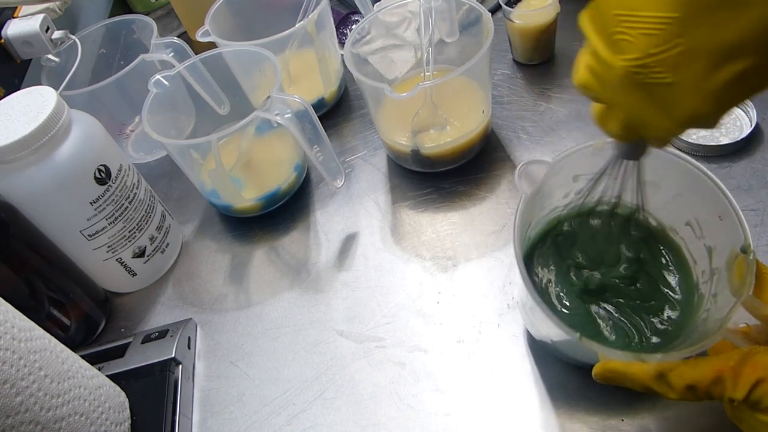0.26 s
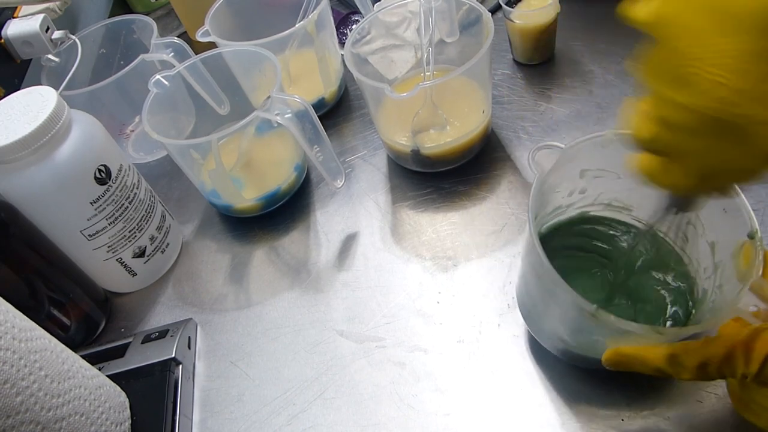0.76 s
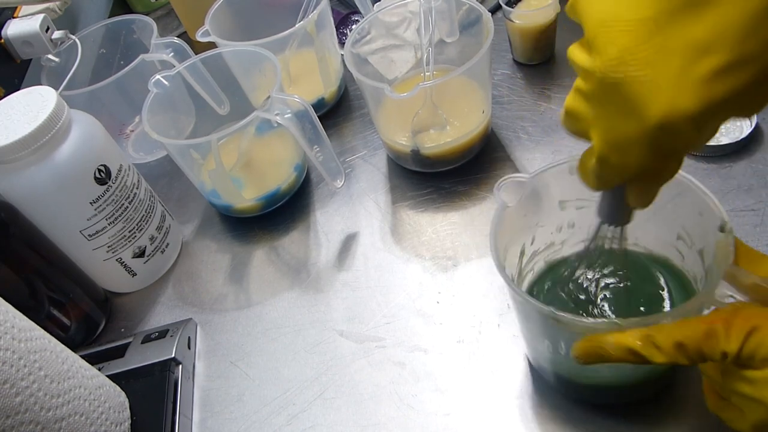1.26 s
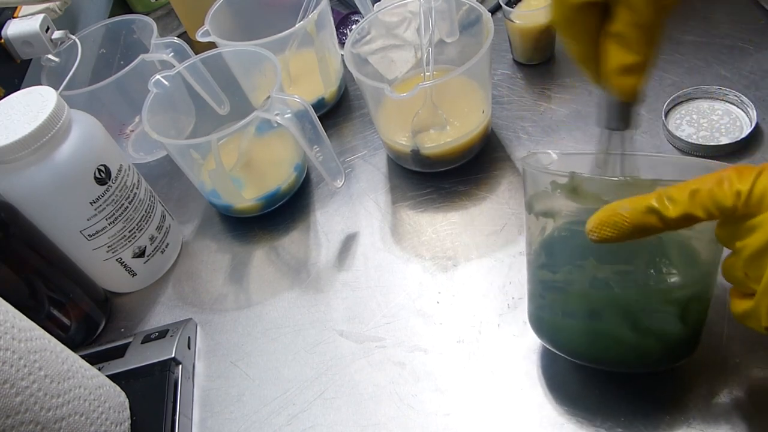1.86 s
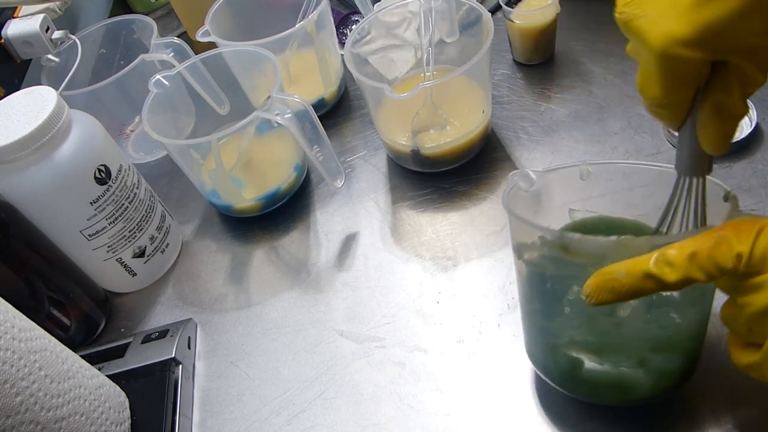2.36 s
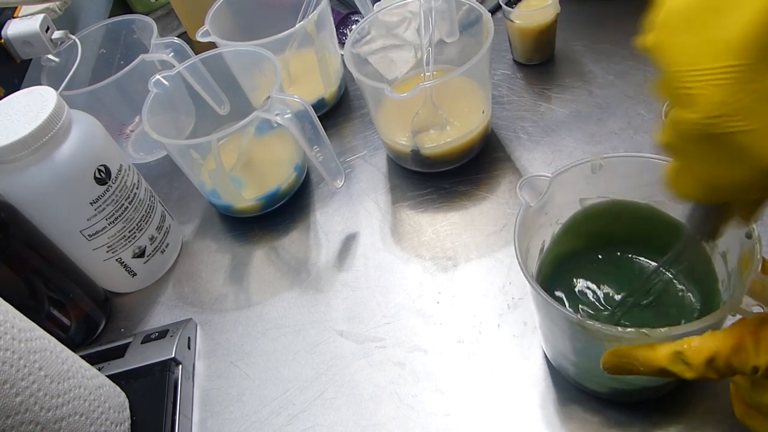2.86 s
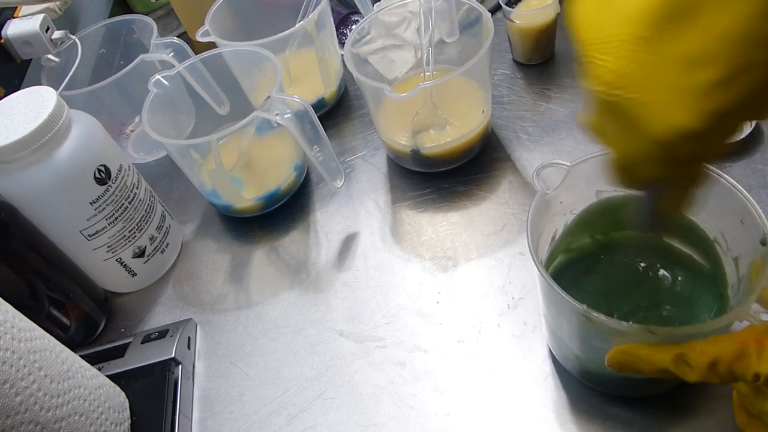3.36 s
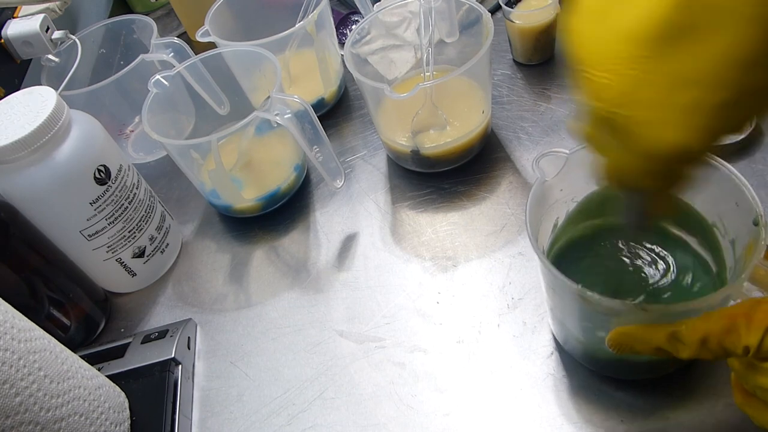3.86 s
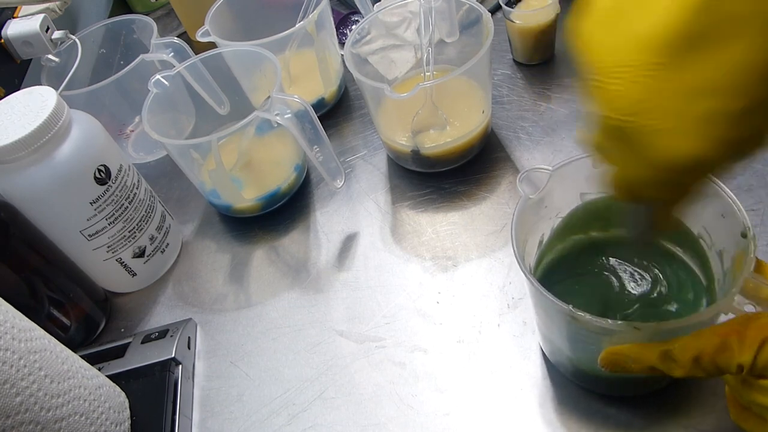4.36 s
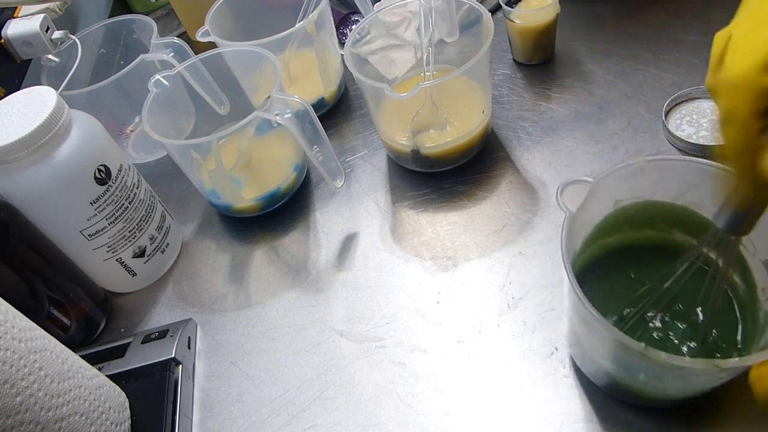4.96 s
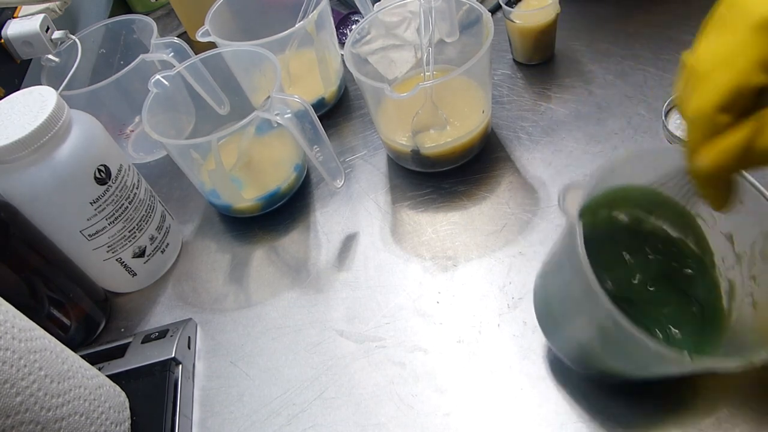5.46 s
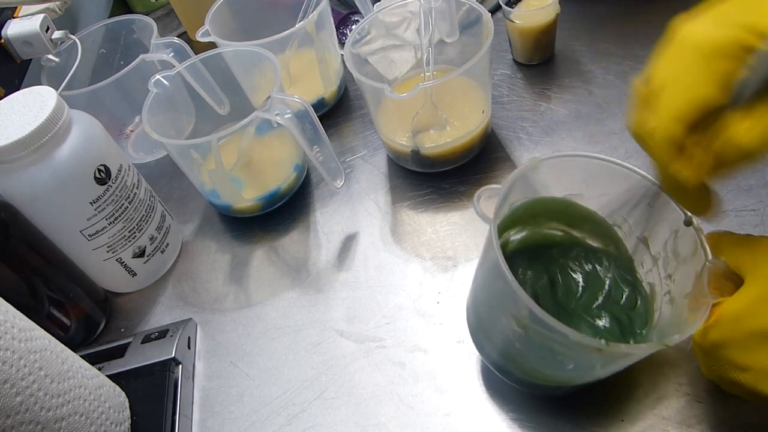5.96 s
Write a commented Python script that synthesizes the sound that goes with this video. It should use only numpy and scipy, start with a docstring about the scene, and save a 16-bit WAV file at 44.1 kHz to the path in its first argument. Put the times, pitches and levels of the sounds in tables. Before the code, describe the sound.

Quick bright clicks of a whisk knocking a plastic jug, with scratchy scraping and soft wet plops, easing into a brief lull before resuming.

```python
"""Quick bright rattles against a plastic jug: a wire whisk beats thick batter on a steel bench, close up.
Each blow is a burst of clicks that rings the jug wall; lighter, shorter blows fall among them.
Slips of the wires scratch the wall; batter slops and plops; the jug rocks and skids, shaking the bench.
A small hard room answers with a short stereo tail, over faint microphone hiss and one bright rustle."""
import sys
import numpy as np
from scipy import signal
from scipy.fft import rfft, irfft
from scipy.io import wavfile
from scipy.ndimage import uniform_filter1d

SR = 44100
rng = np.random.default_rng(int(sys.argv[2]) if len(sys.argv) > 2 else 0)


def file_out(sig):
    """Save sig as 16-bit WAV at sys.argv[1]."""
    # one column per channel
    cols = np.atleast_2d(sig).T
    # limit, then scale
    lim = np.clip(cols, -1, 1)
    pcm = np.round(lim * 32767).astype(np.int16)
    wavfile.write(sys.argv[1], SR, pcm)


N = 273949

# whisk blows on the wall: start_s, level_db (nominal), boom_db (re level_db), pitch_hz (of the struck spot)
BLOWS = [(0.065, -13.5, -17, 2810), (0.132, -11, -22, 3960), (0.207, -21, -13, 2790),
         (0.338, -7, -14.5, 4040), (0.444, -18, -17.5, 1770), (0.529, -14, -17.5, 2060),
         (0.588, -9.5, -41, 4030), (0.627, -14, -23, 3320), (0.649, -13.5, -28, 3050),
         (0.736, -9, -48, 3770), (0.775, -12.5, -29, 3980), (0.827, -13, -33, 2050),
         (0.843, -14.5, -33, 3490), (0.916, -6.5, -37, 3930), (0.978, -14, -34, 2940),
         (0.991, -13, -17, 3440), (1.013, -11.5, -22, 1753), (1.098, -11, -28, 2510),
         (1.117, -13, -14.5, 1940), (1.176, -14.5, -43, 3750), (1.254, -19.5, -36, 4050),
         (1.294, -18, -10.5, 2050), (1.416, -13, -14, 2110), (1.616, -11, -21, 2180),
         (1.661, -15.5, -21, 1820), (1.758, -14, -6, 3270), (1.848, -24, -9.5, 1730),
         (1.921, -14.5, -23, 2530), (1.974, -14, -18.5, 2370), (2.031, -14, -12.5, 2005),
         (2.115, -10.5, -11, 1530), (2.163, -19, -6.5, 3660), (2.19, -16.5, -18, 2500),
         (2.203, -16.5, -29, 3030), (2.26, -18, -8, 2205), (2.308, -19.5, -20, 4040),
         (2.322, -12.5, -14.5, 3390), (2.433, -18.5, -12.5, 2660), (2.482, -17, -16, 2700),
         (2.497, -17.5, -26, 2980), (2.548, -15, -22, 2360), (2.602, -10.5, -25.5, 3570),
         (2.699, -17, -18, 2430), (2.721, -15.5, -24, 2180), (2.746, -16, -23, 3090),
         (2.817, -13.5, -25, 3500), (2.858, -12.5, -27, 3270), (2.955, -12, -13, 1930),
         (3.128, -11.5, -35, 3100), (3.269, -14.5, -19, 2410), (3.325, -17.5, -29, 2300),
         (3.36, -16, -16, 2195), (3.425, -18.5, -13, 1960), (3.461, -22, -24, 1990),
         (3.511, -15.5, -28, 2270), (3.575, -15.5, -17, 3240), (3.607, -11, -20, 2530),
         (3.638, -16.5, -22, 2150), (3.709, -18.5, -22, 4040), (3.754, -16, -21, 2150),
         (3.808, -16.5, -14, 2025), (3.852, -15.5, -22, 2700), (3.871, -14.5, -35, 2440),
         (3.943, -16.5, -8.5, 3050), (4.001, -15, -37, 3300), (4.119, -13.5, -42, 2360),
         (4.158, -11.5, -17, 2260), (4.185, -14, -9, 2700), (4.304, -19.5, -13, 2250),
         (4.318, -18.5, -13, 2360), (4.361, -16.5, -39, 2260), (4.382, -16, -25, 2190),
         (4.4, -13.5, -29, 2480), (4.406, -14.5, -23, 4040), (4.508, -17, -19.5, 1890),
         (4.565, -17.5, -18, 2900), (4.601, -13, -20, 2570), (4.623, -15, -16, 2550),
         (4.742, -22, -17, 3960), (4.963, -21.5, -9, 2030), (5.053, -20.5, -11, 1980),
         (5.123, -24.5, -10.5, 1670), (5.463, -17.5, -23.5, 2700), (5.657, -11, -20, 3050),
         (5.69, -18.5, -19, 2480), (5.752, -15, -9.5, 2350), (5.874, -23.5, -11, 2080),
         (5.972, -13, -19.5, 3040), (6.031, -18, -12, 2540), (6.093, -12.5, -28, 2610)]
# modes of the jug wall, the first five being its boom: pitch_hz, level_db (relative)
JUG_MODES = [(755, 14), (820, 20.5), (990, 23), (1130, 19.5), (1235, 20.5), (1600, 13.5), (1760, 15.5),
             (2000, 17), (2160, 18.5), (2360, 10), (2530, 12.5), (2880, 11.5), (3200, 16.5), (3520, 16),
             (4040, 4),]
# colour of the wires' ticks: pitch_hz, level_db (per Hz, relative)
TICK_COLOUR = [(700, -13), (2000, 0.5), (4500, 0.5), (6500, -3.5), (9000, -3), (11500, -8.5), (14000, -21),
               (16000, -37)]
JUG_T60_S = 0.036  # every mode under a blow, damped by the batter
PATCH_DB, PATCH_T60_S = -17.5, 0.022  # the struck spot's own ring, re the blow
RATTLE_S, LIGHT_RATTLE_S = 0.0032, 0.0018  # how long the wires keep landing


def blows(treble_db, rise_s=0.00027, detune=0.036, near_db=26.0, place_db=3.5,
          mid_db=-16, tick_db=-12, shiver_db=-17, shiver_s=0.024):
    """Wires land one after another; every spot on the wall drives the modes in its own mix."""
    size = 8192
    out, ticks = np.zeros(N + size), np.zeros(N + size)
    t = np.arange(size) / SR
    head = slice(0, SR // 50)  # levels are set over the first 20 ms
    swell = 1 - np.exp(-t / rise_s)  # the bunch lands just behind the first wire
    strokes = [row + (RATTLE_S,) for row in BLOWS] + light_blows()
    for start_s, db, boom_db, spot_hz, rattle_s in strokes:
        rattle = clicks(size, 2500.0, 1.0) * np.exp(-t / rattle_s) * swell
        rattle[SR // 600] = 1.25  # the thickest wire lands hardest

        modes = []
        spot = rng.standard_normal((len(JUG_MODES), 2))
        for (hz, mode_db), (place, shift) in zip(JUG_MODES, spot):
            # modes close to the pitch of the struck spot answer loudest
            nearness = np.exp(-(np.log(hz / spot_hz) / 0.0099) ** 2)
            gain = undb(mode_db + place_db * place + near_db * nearness)
            modes.append(gain * ring(rattle, hz * (1 + detune * shift), JUG_T60_S))
        boom, mid = sum(modes[:5]), sum(modes[5:])

        # the wires go on chattering against each other for a moment
        chatter = clicks(size, 9000.0, 3.4) * np.exp(-t / shiver_s) * swell
        bright = rattle + undb(shiver_db) * chatter
        patch = ring(bright, spot_hz, PATCH_T60_S)
        # a copy at a random tiny delay varies each tick's colour
        bright = bright + 0.5 * np.roll(bright, rng.integers(2, 16))

        first = int(start_s * SR)
        at = slice(first, first + size)
        out[at] += undb(db + mid_db) * mid / mid[head].std()
        out[at] += undb(db + boom_db) * boom / boom[head].std()
        out[at] += undb(db + PATCH_DB) * patch / patch[head].std()
        # harder blows are brighter
        ticks[at] += undb(db + tick_db + 0.6 * (db + 17.0)) * bright / bright[head].std()

    colour_gain = colour(rng.standard_normal(N), TICK_COLOUR).std()
    ticks = colour(ticks[:N], TICK_COLOUR) / colour_gain
    # the small wall radiates little bass
    bass_cut = signal.butter(3, 600.0, "high", fs=SR, output="sos")
    wall, ticks = signal.sosfilt(bass_cut, [out[:N], ticks])
    dull = signal.sosfilt(signal.butter(1, 7000.0, fs=SR, output="sos"), ticks)
    return wall + dull + undb(treble_db) * (ticks - dull)


# lighter, shorter whisk blows among the others: start_s, level_db (nominal)
LIGHT_BLOWS = [(0.02, -19), (0.271, -26), (0.486, -18.5), (0.519, -23), (0.69, -20), (0.703, -20),
               (0.727, -20), (0.818, -16), (0.893, -21), (0.911, -16), (1.086, -19.5), (1.264, -24),
               (1.408, -23), (1.439, -21.5), (1.482, -22.5), (1.61, -21), (2.009, -21), (2.083, -24.5),
               (2.28, -22), (2.368, -23.5), (2.41, -23.5), (2.455, -19), (2.565, -17.5), (2.631, -20.5),
               (2.738, -19), (2.902, -16), (2.974, -15.5), (3.17, -19), (3.19, -20.5), (3.259, -20),
               (3.389, -19), (3.476, -20), (3.581, -13.5), (3.622, -14.5), (3.647, -17.5), (3.721, -21.5),
               (3.739, -28), (3.775, -25), (3.899, -16), (4.041, -19.5), (4.053, -24), (4.063, -23),
               (4.089, -21.5), (4.26, -24), (4.436, -21), (4.487, -31), (4.547, -18.5), (4.687, -23.5),
               (5.492, -20), (5.562, -26), (5.715, -27), (5.744, -24), (5.794, -19.5), (5.848, -26.5),
               (5.909, -26.5), (5.963, -14.5), (6.013, -20), (6.1, -12.5),]
LIGHT_BOOM_DB, LIGHT_HZ, LIGHT_SPREAD = -18, 2643, 0.237  # boom re level; middle pitch; its log scatter


def light_blows():
    """Lighter, shorter whisk blows, each with a pitch drawn at random."""
    rows = []
    for start_s, db in LIGHT_BLOWS:
        spot_hz = LIGHT_HZ * np.exp(LIGHT_SPREAD * rng.standard_normal())
        rows.append((start_s, db, LIGHT_BOOM_DB, spot_hz, LIGHT_RATTLE_S))
    return rows


# wires catch the wall and let go; between catches they glide softly
GRABS_PER_S, GRAB_S, GLIDE_DB = 110.0, 0.0062, -8


def scratch(db, treble_db, bright_db=-1.5):
    """Dense small slips of the wires along the wall; each mode comes and goes as the contact moves."""
    grabs = decay(np.abs(clicks(N, GRABS_PER_S, 1.2)), GRAB_S)
    slips = clicks(N, 4000.0, 1.3) * (grabs + undb(GLIDE_DB))
    wall = 0
    for hz, mode_db in JUG_MODES:
        contact = slips * flicker(60.0, 4.0) * rng.standard_normal(N)
        wall = wall + undb(mode_db) * ring(contact, hz, 0.77 * JUG_T60_S)
    bright = level(colour(slips, TICK_COLOUR), bright_db)
    return undb(db) * (level(wall, -3) + undb(treble_db) * bright)


# batter and the air above it: pitch_hz, width_hz, level_db (relative)
BATTER_MODES = [(310.6, 40, -5), (421, 91, 0.5), (568, 28, -4.5), (790, 174, -1)]
# plops of trapped air: start_s, level_db (nominal), pitch_hz
PLOPS = [(0.97, -28, 328), (1.117, -28, 431), (1.422, -25.5, 356), (1.454, -32, 340), (1.468, -36.5, 403),
         (1.527, -32, 271), (3.581, -24, 564), (4.177, -26, 308)]


def slop(db, glide=0.081, rise_s=0.00073, fall_s=0.019, rough=0.47, overtone=2.6, overtone_db=-6):
    """Thick batter folds over and sucks at the wall; pockets of air burst with a rising, ragged note."""
    folds = clicks(N, 2000.0, 1.86) * flicker(12.0, 4.45)
    out = undb(db) * level(shake(folds, BATTER_MODES), -0.49)
    t = np.arange(SR // 6) / SR
    envelope = (1 - np.exp(-t / rise_s)) * np.exp(-t / fall_s)
    for start_s, plop_db, hz in PLOPS:
        ragged = uniform_filter1d(rng.standard_normal((2, len(t))), 160)
        wobble = 1 + rough * level(ragged, 0)
        phase = 2 * np.pi * hz * t * (1 + glide * (t / fall_s - 1) / 2)
        note = wobble[0] * np.sin(phase) + undb(overtone_db) * wobble[1] * np.sin(overtone * phase)
        first = int(start_s * SR)
        out[first:first + len(t)] += undb(plop_db) * note * envelope
    return out


# bench top: pitch_hz, width_hz, level_db (relative)
BENCH_MODES = [(134.6, 29, -1), (162, 32, 3), (201.5, 25, 3.5)]


def drag(db):
    """The jug's foot judders on the steel and shakes the bench."""
    return undb(db) * level(shake(clicks(N, 1500.0, 0.43), BENCH_MODES), -0.78)


# the jug skids on the bench: middle_s, rumble_db, slop_db
SKIDS = [(2.51, -45, -52), (2.949, -34, -23), (5.69, -44, -43.5)]
SKID_HOLD_S, SKID_FADE_DB_PER_S = 0.032, 316  # on either side of its middle


def with_skids(t, steady_db, skid_db):
    """Adds the power of each skid's swell to a steady level."""
    power = undb(steady_db) ** 2
    for row, db in zip(SKIDS, skid_db):
        beyond_s = np.maximum(np.abs(t - row[0]) - SKID_HOLD_S, 0)
        power = power + undb(db - SKID_FADE_DB_PER_S * beyond_s) ** 2
    return 10 * np.log10(power)


ROOM_T60_S, ROOM_DB, ROOM_SIDE_DB = 0.075, -6.5, -10.5


def room(x):
    """A decaying cloud of echoes, a little different at each ear."""
    t = np.arange(SR // 2) / SR
    envelope = undb(-60 * t / ROOM_T60_S) * (1 - np.exp(-t / 0.0019))
    mid, side = rng.standard_normal((2, len(t))) * envelope
    scale = undb(ROOM_DB) / np.sqrt(np.sum(mid ** 2))
    tail = scale * (mid + undb(ROOM_SIDE_DB) * side * np.array([[1], [-1]]))
    return signal.fftconvolve(x[None], tail, axes=1)[:, :N]


# colour of the air and microphone noise: pitch_hz, level_db (per Hz, relative)
HISS_COLOUR = [(40, -2), (150, -23), (450, 8.5), (1500, 11), (3300, 4.5), (5000, 2), (10000, -0.5),
               (16000, -12)]
HISS_DB = -50
# a faint bright rustle while the jug is tipped: middle_s, half_length_s, level_db (before its swell)
RUSTLE = (5.28, 0.24, -51.5)


def hiss():
    """Steady air and microphone noise, slightly wide, and one faint rustle that swells and fades."""
    mid, side = colour(rng.standard_normal((2, N)), HISS_COLOUR)
    noise = level(mid + undb(-12.5) * side * np.array([[1], [-1]]), HISS_DB)
    middle_s, half_s, db = RUSTLE
    swell = np.exp(-((np.arange(N) / SR - middle_s) / half_s) ** 2)
    return noise + level(colour(rng.standard_normal(N), TICK_COLOUR), db) * swell


def clicks(count, per_s, scatter_db):
    """Random clicks of either sign, a few much bigger than the rest."""
    hit = rng.random(count) < per_s / SR
    size = undb(scatter_db * np.minimum(rng.exponential(size=count), 4))
    return hit * np.sign(rng.standard_normal(count)) * size


def ring(x, hz, t60):
    """One damped mode; it radiates nothing far below its pitch."""
    r = np.exp(-np.log(1000) / (t60 * SR))
    return signal.lfilter([0.5, 0, -0.5], [1, -2 * r * np.cos(2 * np.pi * hz / SR), r * r], x)


def shake(x, peaks):
    """Drives each (pitch_hz, width_hz, level_db) resonance with its own randomly weighted copy of x."""
    total = 0
    for hz, width_hz, db in peaks:
        t60 = np.log(1000) / (np.pi * width_hz)
        total = total + level(ring(x * rng.standard_normal(N), hz, t60), db)
    return total


def flicker(per_s, db):
    """A gain that wanders at random."""
    k = int(SR / per_s)
    steps = np.repeat(rng.standard_normal(N // k + 1), k)
    return undb(db * uniform_filter1d(steps, k)[:N])


def decay(x, seconds):
    """Lets every impulse die away exponentially."""
    return signal.lfilter([1], [1, -np.exp(-1 / (seconds * SR))], x)


def colour(x, points):
    """Shapes a spectrum by (pitch_hz, level_db) points, joined along log frequency."""
    hz, db = np.transpose(points)
    f = np.maximum(np.fft.rfftfreq(x.shape[-1], 1 / SR), 1)
    return irfft(rfft(x) * undb(np.interp(np.log(f), np.log(hz), db)), x.shape[-1])


def level(x, db):
    """Sets the RMS level."""
    return x * undb(db) / np.sqrt(np.mean(x ** 2))


def undb(db):
    """Decibels to amplitude."""
    return 10 ** (np.asarray(db) / 20)


# the stirring: time_s, scratch_db, moving_db (jug and batter), treble_db (of the wires)
STIR = [(0.0, -31.5, -43.5, -2), (0.33, -33.5, -56.5, -11.5), (0.83, -31.5, -44, -1),
        (1.57, -35, -46, -6.5), (2.37, -28, -47.5, -3), (2.9, -32.5, -44, 0.5), (3.1, -41.5, -48, 1),
        (3.2, -37, -43.5, -0.5), (3.86, -27, -40, 0.5), (4.44, -29.5, -39, 1), (4.82, -45, -50.5, 3),
        (5.55, -39, -53, -2.5), (6.21, -29.5, -45.5, -7.5)]
BENCH_RE_DB, BATTER_RE_DB = -7.5, 4  # how the moving jug is heard through each


def scene():
    """The jug, batter and bench, near the microphone and in the room."""
    t = np.arange(N) / SR
    time_s, wires_db, moving_db, treble_db = np.transpose(STIR)
    _, rumble_db, skid_slop_db = np.transpose(SKIDS)
    scratch_db = np.interp(t, time_s, wires_db)
    moving_db = np.interp(t, time_s, moving_db)
    treble_db = np.interp(t, time_s, treble_db)
    drag_db = with_skids(t, moving_db + BENCH_RE_DB, rumble_db)
    slop_db = with_skids(t, moving_db + BATTER_RE_DB, skid_slop_db)

    hits = blows(treble_db)
    # the wires scratch and slap the batter hardest just after they land
    # and lift off before the next blow
    press = decay(np.abs(hits), 0.0099) + 1e-3
    press = (press / uniform_filter1d(press, SR // 3)) ** 0.38

    jug = hits + press * scratch(scratch_db, treble_db)
    batter = slop(slop_db + 8 * np.log10(press))
    bench = drag(drag_db)
    # left and right gains in dB
    near = jug * undb([[-0.2], [0.2]]) + batter * undb([[-1.3], [1.3]]) + bench * undb([[0.4], [-0.4]])
    return near + room(jug + batter + undb(2.5) * bench)


TOP_HZ = 16000


def record(dry):
    """The microphone drops the deep bass, rounds the highest peaks, hisses faintly and cuts the top."""
    bass_cut = signal.butter(3, 125.0, "high", fs=SR, output="sos")
    thin = signal.sosfilt(bass_cut, undb(-4.5) * dry)
    rounded = np.tanh(1.3 * thin) / 1.3
    top_cut = signal.ellip(10, 0.2, 90, TOP_HZ, fs=SR, output="sos")
    return signal.sosfilt(top_cut, rounded + hiss())


dry = scene()
out = record(dry)
file_out(out)
```